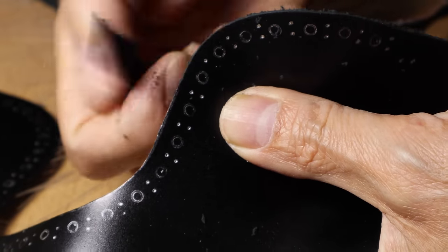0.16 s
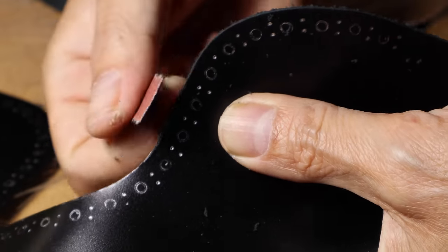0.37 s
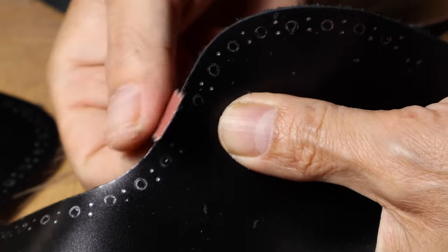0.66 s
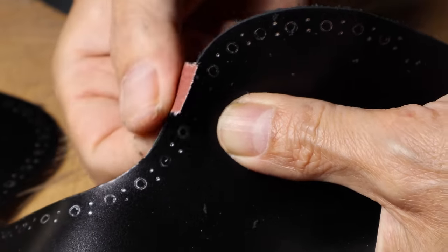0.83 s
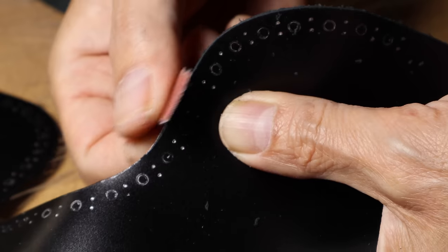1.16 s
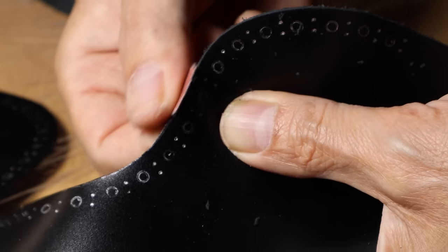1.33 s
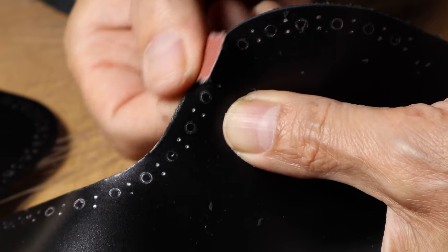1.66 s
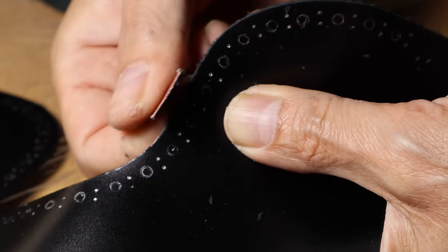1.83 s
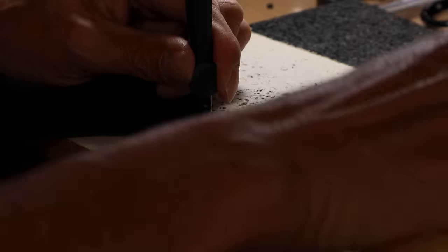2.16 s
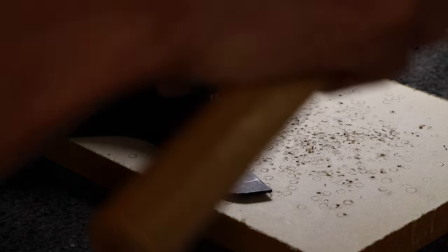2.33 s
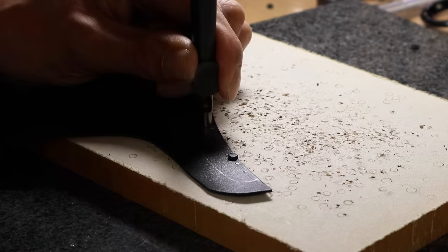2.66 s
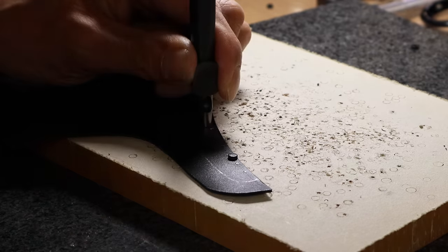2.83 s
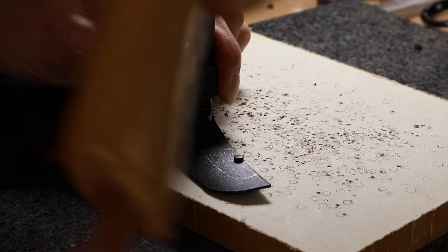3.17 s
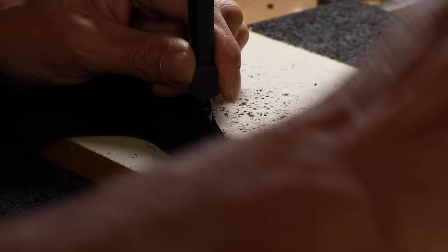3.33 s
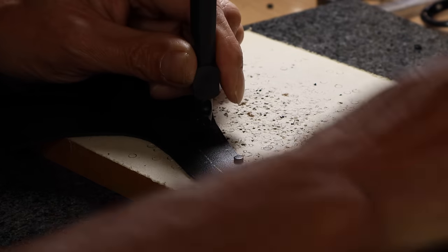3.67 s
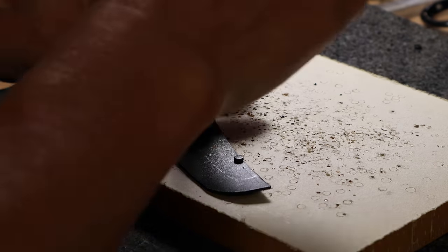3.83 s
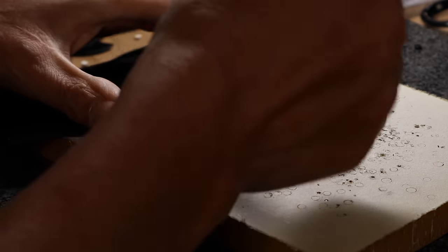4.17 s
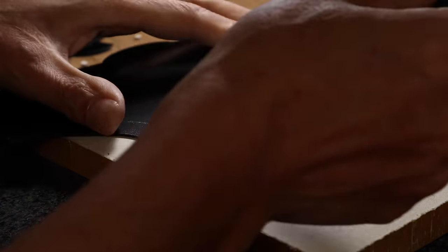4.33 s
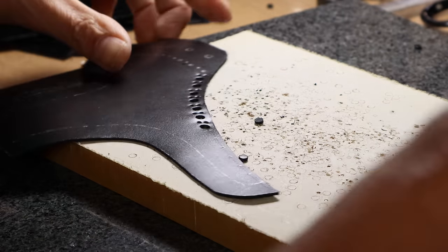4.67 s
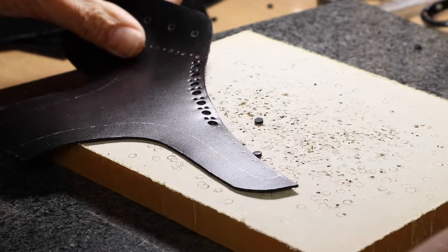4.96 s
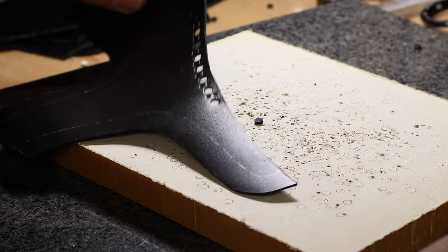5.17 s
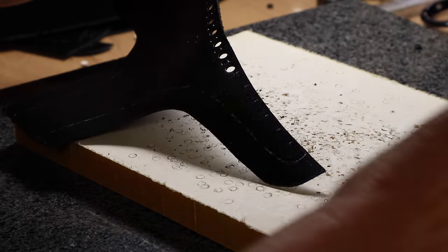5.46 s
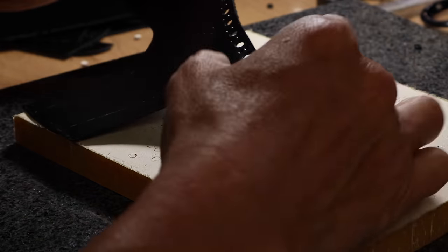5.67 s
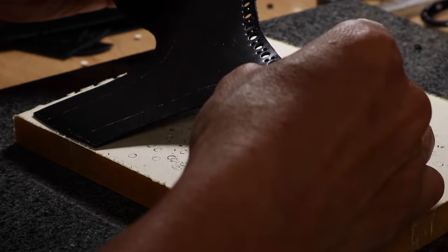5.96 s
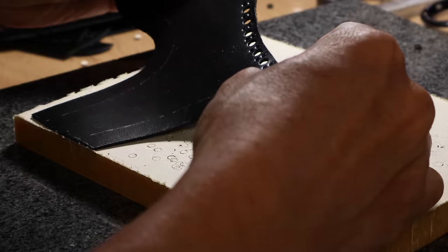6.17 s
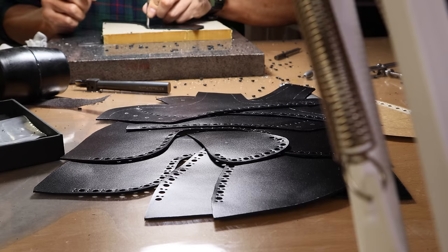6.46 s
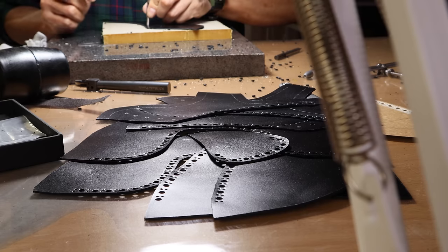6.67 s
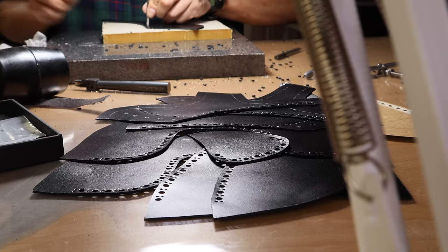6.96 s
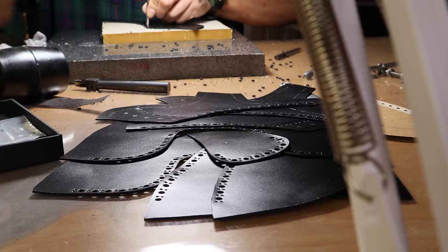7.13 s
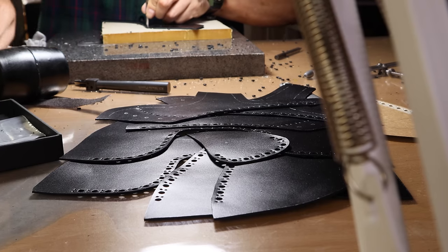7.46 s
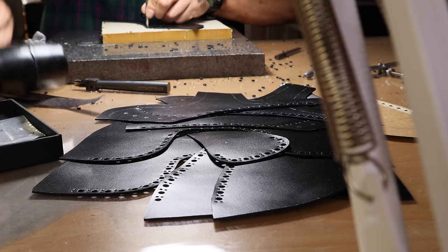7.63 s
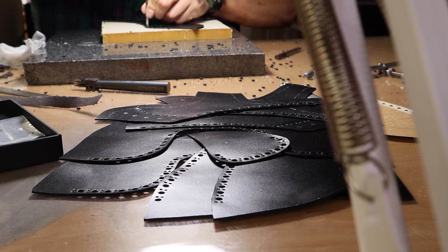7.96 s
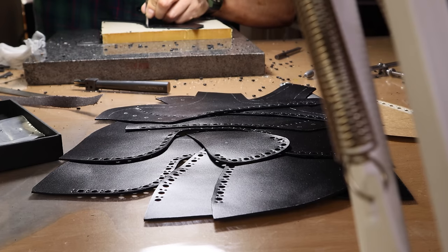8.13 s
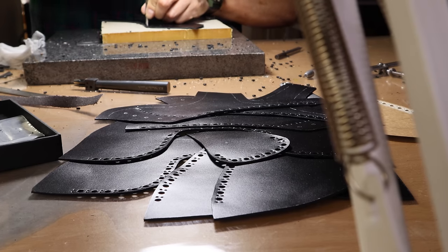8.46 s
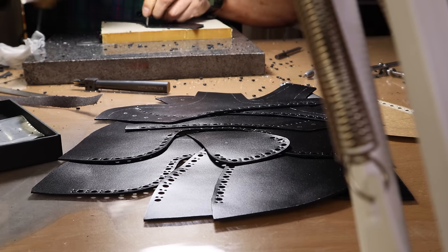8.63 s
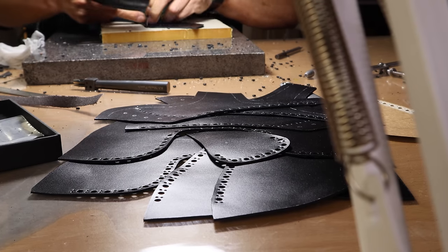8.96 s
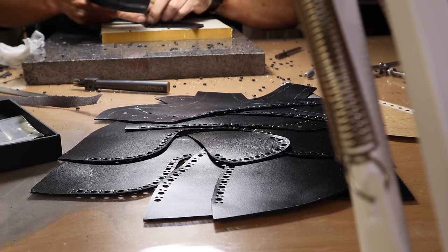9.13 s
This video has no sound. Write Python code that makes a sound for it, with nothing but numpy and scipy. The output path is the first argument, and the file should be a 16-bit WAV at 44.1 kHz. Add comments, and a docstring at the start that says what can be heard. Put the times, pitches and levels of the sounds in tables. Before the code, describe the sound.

A mallet cracks a hole punch into a cutting board twice, seconds apart, while tools knock, clink and bounce on a quiet workbench.

```python
"""A small workshop, at a leatherworker's bench. Fingers rub a leather edge, and stick-slip friction hisses.
A mallet drives a steel punch into a cutting board: each impact cracks and excites the modes of the wood.
Between the two hard blows, the mallet handle drops on the slab, and tools clink, knock and bounce.
The hardest blow overloads the recorder, whose gain control ducks and lets the room swell back.
A stand shakes with a low rumble after the last blow. Room air and a faint hum lie underneath."""
import sys
import numpy as np
from scipy import signal
from scipy.fft import rfft, irfft, next_fast_len
from scipy.io import wavfile
from scipy.ndimage import uniform_filter1d, minimum_filter1d, map_coordinates

SR = 44100
rng = np.random.default_rng(int(sys.argv[2]) if len(sys.argv) > 2 else 0)


def master(y):
    """Save y as 16-bit WAV."""
    cut = np.clip(np.atleast_2d(y).T, -1, 1)
    pcm = np.round(cut * 32767)  # scale
    wavfile.write(sys.argv[1], SR, pcm.astype(np.int16))


N = 409953
TIME = np.arange(N) / SR
AGE = TIME[:SR]  # seconds since a contact
HZ = np.fft.rfftfreq(2 * SR, 1 / SR)

# Sharp knocks: a light tap, two hard punch blows and, between them, the mallet handle dropping on the slab.
# Each row: start in seconds, level in dB, crack centre and contact cut-off in Hz,
# then board thud, wooden knock and room in relative dB.
SHARP_KNOCKS = [(2.7241, -21, 1878, 6500, -1, -11, -12.5), (3.0428, 6, 1380, 18000, -11.5, -13, -9),
                (3.72, -12.5, 1700, 18000, -10.5, -9.5, -14.5), (3.7502, -26, 2504, 9000, -6.5, -1, -14),
                (8.3428, -2.5, 3265, 7500, -10, -3, -13)]
# Spectrum of the crack. Each row: frequency in Hz, level in dB.
CRACK_SPECTRUM = [(30, -13.5), (150, -3), (400, -2), (620, 1), (1100, -0.5), (2100, -5), (3600, -6.5),
                  (5200, -13.5), (8000, -23.5), (12000, -30), (16000, -35)]
# Modes of the cutting board, of knocked wood and of a stand that shakes after the last blow.
# Each row: frequency in Hz, level in dB, time to decay by 60 dB (t60) in seconds.
BOARD_MODES = [(118, -8.5, 0.22), (150, -8.5, 0.22), (196.8, -1.5, 0.2), (221, -3, 0.19), (285, -9.5, .18),
               (328, -10.5, 0.32), (412, -18.5, 0.28), (600, -17.5, 0.047)]
WOOD_MODES = [(120.35, -18.5, 0.35), (202.6, -8.5, 0.23), (236.5, -12, 0.41), (284, -11.5, 0.45),
              (336, -0.5, .26), (469, -2, 0.089), (575, -2, .1), (692, -2, 0.14), (800, -7.5, .1),
              (884, -0.5, 0.076), (1106, -8.5, .1), (1326, -11.5, .06)]
STAND_MODES = [(31.4, -57, 2.8), (53.6, -56, 2.5), (87.5, -56, 1.6)]


def sharp_knocks(resonance_db=6, heave_lead_s=.0015):
    """Impact excitation: punch blows, a tap and the dropped mallet handle crack and shake the wood."""
    out = np.zeros(N)
    for s, db, hz, cut_hz, thud_db, knock_db, room_db in SHARP_KNOCKS:
        resonance = amp(resonance_db) / impedance(hz, q=2.1)
        crack = amp(along(CRACK_SPECTRUM, HZ)) * np.hypot(1, resonance) * softened(cut_hz)
        thud = amp(thud_db) * ring(BOARD_MODES)
        wood = amp(knock_db) * sized(ring(WOOD_MODES) * fade(AGE, t60=.032))
        impact = hit(crack, t60=.021, grit_db=7.5, body=thud + wood, room_db=room_db, build_s=.012)
        add(out, s, amp(db) * impact)
        add(out, s - heave_lead_s, tone(hz=56.6, db=-12 + 1.9 * db, t60=.05))  # the whole bench heaves
    last_blow_s = SHARP_KNOCKS[-1][0]
    add(out, last_blow_s, sum(tone(*mode) for mode in STAND_MODES))
    return out


# Mallet and fist on the board. Each row: start in seconds, level in dB, pitch ratio, room in relative dB.
THUDS = [(0.433, -50, 0.86, -20), (2.7263, -21.5, 1.18, -31.5), (3.599, -16.5, 1.03, -25.5),
         (3.609, -21, 1.03, -9.5)]
# Bumps as the mallet is picked up. Each row: start in seconds, level in dB.
BUMPS = [(6.672, -46), (6.728, -48), (6.825, -52.5), (6.867, -49.5), (6.928, -46.5), (7.395, -24.5),
         (8.098, -41)]
# Spectrum of a soft contact. Each row: frequency in Hz, level in dB.
THUMP_SPECTRUM = [(30, -27), (90, -9), (180, -1), (300, -0.5), (600, -14.5), (1500, -32.5), (5000, -53.5),
                  (16000, -72)]
# Modes of the bench top. Each row: frequency in Hz, level in dB, t60 in seconds.
BENCH_MODES = [(146, 1.5, 0.19), (207, -9.5, 0.18), (240, -7.5, .18), (275, -13.5, .18),
               (331.3, -14.5, 0.13), (434, -19.5, 0.14), (570, -24, 0.18)]
# Jolted loose things. Each row: start in seconds, frequency in Hz, level in dB, t60 in seconds.
TREMBLES = [(2.721, 1015, -35.5, .4), (2.894, 690, -35, .22), (3.043, 280, -43.5, 3.6),
            (3.043, 1330, -29.5, .7), (5.507, 346, -41, 1.6), (7.652, 1800, -51.5, 0.16)]


def bench(bump_depth_hz=40, bump_db_per_octave=26):
    """Free vibration: soft contacts excite the low modes of board and bench; loose things ring on."""
    out = np.zeros(N)
    thump = amp(along(THUMP_SPECTRUM, HZ))
    radiation = 1 / np.hypot(1, (110 / (HZ + 1)) ** 2)  # small panels radiate little deep bass
    for s, db, pitch, room_db in THUDS:
        body = amp(3) * shaped(ring(BOARD_MODES, pitch), radiation)
        add(out, s, amp(db) * hit(thump, t60=.098, grit_db=3.5, body=body, room_db=room_db))
    for s, db in BUMPS:
        lowest_hz = bump_depth_hz * 2 ** (-db / bump_db_per_octave)  # lighter bumps reach less deep
        depth = 1 / np.hypot(1, (lowest_hz / (HZ + 1)) ** 4)
        body = amp(8) * shaped(ring(BENCH_MODES), depth)
        add(out, s, amp(db) * hit(thump * depth, t60=.07, grit_db=20, body=body, room_db=-18.5))
    for s, hz, db, t60 in TREMBLES:
        add(out, s, tone(hz, db, t60))
    return out


# Tools set down. Each row: start in seconds, level in dB, contact cut-off in Hz.
KNOCKS = [(2.352, -49.5, 1100), (2.7207, -21.5, 1360), (2.8937, -29, 913), (3.599, -26, 906),
          (6.928, -55.5, 1200), (7.373, -46.5, 1630), (7.72, -47, 1200), (8.096, -38.5, 895)]
# Two tools let fall, then a dull room echo swelling just after the loud knock.
# Each row: start in seconds, level in dB, first flight in seconds, number of rebounds,
# loss at the first rebound in dB, contact cut-off in Hz, then steel tip and room in relative dB.
DROPS_AND_ECHO = [(5.3481, -11, .0484, 1, 8.5, 800, -34, -14),
                  (5.5056, -8, .0972, 5, 14, 1150, -19.5, -6.5), (5.538, -23, .19, 1, 11, 752, -28, -4)]


def tools(wood_dulling=.9, tip_dulling=.75, tip_lead_s=.008):
    """Inelastic collision: tools knock and skid, or bounce ever faster and duller; the room echoes."""
    out = np.zeros(N)
    for s, db, cut_hz in KNOCKS:
        landing = knock(cut_hz, room_db=-7.5 + distance_db(s))
        skid = amp(-10.5) * puff(s, hz=2300, t60=.16)
        add(out, s, amp(db) * (landing + skid))
    for start, first_db, flight, count, loss_db, cut_hz, tip_db, room_db in DROPS_AND_ECHO:
        for k, (s, db) in enumerate(bounces(start, first_db, flight, loss_db, count)):
            add(out, s, amp(db) * knock(cut_hz * wood_dulling ** k, room_db))
            tip = puff(s, hz=6500 * tip_dulling ** k, t60=.02)
            add(out, s - tip_lead_s * (k > 0), amp(db + tip_db) * tip)  # on a rebound the tip lands first
    return out


# Spectrum of a tool meeting wood. Each row: frequency in Hz, level in dB.
KNOCK_SPECTRUM = [(30, -26.5), (100, -14), (250, -2), (600, 5.5), (1200, -0.5), (2200, -8.5), (4000, -3),
                  (8000, -16.5), (16000, -11.5)]


def knock(cut_hz, room_db):
    """Contact time limits the bandwidth of a knock and of the wood's ring."""
    push = amp(along(KNOCK_SPECTRUM, HZ)) * softened(cut_hz)
    body = amp(-6.5) * shaped(ring(WOOD_MODES), softened(cut_hz))
    return hit(push, t60=.025, grit_db=3, body=body, room_db=room_db)


# Punches touching. Each row: start in seconds, level in dB, contact cut-off in Hz, number of rebounds.
CLINKS = [(5.0316, -30, 19990, 0), (5.0867, -34, 19000, 0), (5.1221, -32.5, 8500, 0),
          (5.1454, -23.5, 5798, 2), (5.191, -32.5, 5500, 1), (5.215, -33, 8502, 0), (5.2939, -35, 5800, 0)]
# Modes of a steel punch. Each row: frequency in Hz, level in dB, t60 in seconds.
STEEL_MODES = [(1045, -7.5, .08), (1150, -8, 0.24), (1420, -11, 0.14), (1487, -1, 0.25), (2560, -8, .17),
               (2645, -4, .15), (2770, -7, 0.067), (3120, -10.5, 0.095), (3947, 5.5, .2), (4377, -2.5, .08),
               (4910, -5.5, 0.18), (7100, -13, .07), (7420, -14.5, .18), (9000, -19, .12),
               (10240, -10, .06), (12560, -3.5, .06), (12880, -12, .18)]
# Spectrum of steel on steel. Each row: frequency in Hz, level in dB.
CLICK_SPECTRUM = [(100, -22.5), (700, -3.5), (1400, 7.5), (2000, -5.5), (2800, 1.5), (3500, -10),
                  (4500, -3.5), (6000, -22.5), (7200, -12.5), (12800, -8.5), (15000, -23.5)]


def punches():
    """Damped bar vibration: steel shanks click together, ring in the hand and nudge the wood below."""
    out = np.zeros(N)
    grasp = np.exp(-(AGE / .05) ** 2)  # the fingers close and choke the ring
    for start, first_db, cut_hz, count in CLINKS:
        # a hard touch at the tip favours the high modes, a soft one along the shank the low modes
        touch = softened(cut_hz) ** 2 / np.hypot(1, .09 * cut_hz / (HZ + 1))
        click = amp(along(CLICK_SPECTRUM, HZ)) * touch
        nudge_db = -16 + 8 * np.log2(cut_hz / 5500)  # harder touches push the wood more
        for s, db in bounces(start, first_db, flight_s=.0125, loss_db=4.5, count=count):
            steel = amp(1) * shaped(ring(STEEL_MODES) * grasp, touch)
            wood = amp(nudge_db) * sized(ring(WOOD_MODES) + ring(BOARD_MODES))
            add(out, s, amp(db) * hit(click, t60=.022, grit_db=6.5, body=steel + wood, room_db=-9))
    return out


# Strokes along the edge. Each row: start, fastest moment and end in seconds, level in dB.
STROKES = [(0.819, 0.829, 0.9, -41.5), (1.11, 1.125, 1.175, -40.5), (1.377, 1.409, 1.468, -40),
           (1.651, 1.719, 1.765, -40), (2.026, 2.062, 2.084, -42)]
# Leather and sleeves sliding. Each row: start and end in seconds, level in dB.
SLIDES = [(0, 1.4, -62), (1.6, 2.056, -64), (3.95, 4.33, -64.5), (4.7, 5.4, -67), (7.7, 8.15, -64),
          (8.7, 9.06, -67.5)]
# Spectra of the rubbed edge, the sliding and skin on leather. Each row: frequency in Hz, level in dB.
RUB_SPECTRUM = [(120, -36), (200, -6), (305, -5), (821, 0), (1500, 6), (2420, -9.5), (2610, -6.5),
                (3070, -12), (3760, -6.5), (5520, -32), (7010, -20), (7830, -25.5), (16000, -32.5)]
RUSTLE_SPECTRUM = [(200, -16), (600, 4.5), (1400, 3), (2300, -3.5), (3600, 4), (5500, -9), (9000, -18),
                   (16000, -15.5)]
SKIN_SPECTRUM = [(1500, -23.5), (3000, -2), (4300, 2.5), (6000, -4.5), (14000, -7)]


def leather(speed_exponent=.85, rise_db_per_s=55.5, fall_db_per_s=65.5, creaks_per_s=15):
    """Friction noise grows with speed: fingers stroke the edge, and the piece slides and flexes."""
    stroke = sum(amp(db) * np.interp(TIME, [start, fastest, end], [0, 1, 0]) ** speed_exponent
                 for start, fastest, end, db in STROKES)
    slide = sum(amp(db - rise_db_per_s * np.maximum(start - TIME, 0)
                    - fall_db_per_s * np.maximum(TIME - end, 0)) for start, end, db in SLIDES)
    rustle = amp(2.7 * wobble(per_s=21)) * friction(RUSTLE_SPECTRUM, per_s=67, slip_db=-6.5)
    # dry skin catches and lets go, adding brief whispers of treble
    whisper = amp(-15.5 + 3.5 * wobble(per_s=12)) * friction(SKIN_SPECTRUM, per_s=200, slip_db=-11)
    flexes = impulses(creaks_per_s)
    tick = rng.standard_normal(SR) * fade(AGE, t60=.018)
    creaks = amp(-17) * coloured(signal.fftconvolve(flexes, tick)[:N], SKIN_SPECTRUM)
    rub = friction(RUB_SPECTRUM, per_s=350, slip_db=-1)
    return stroke * rub + slide * (rustle + whisper + creaks)


def friction(spectrum, per_s, slip_db):
    """Stick-slip motion: many tiny slips of uneven size over a fine hiss."""
    slips = amp(slip_db) * unit(impulses(per_s))
    return coloured(rng.standard_normal(N) + slips, spectrum)


# Taps of fingers, leather and tools. Each row: start in seconds, level in dB, centre in Hz, t60 in seconds.
TAPS = [(.062, -47.5, 1630, 0.083), (0.118, -45.5, 1300, 0.11), (.455, -48, 1310, 0.017),
        (.641, -58.5, 3983, 0.054), (.76, -52.5, 1710, 0.045), (1.121, -44, 1360, .017),
        (2.752, -32.5, 970, .02), (4.317, -51, 2800, 0.019), (4.367, -39, 3500, 0.0094),
        (4.632, -52.5, 1588, 0.052), (6.77, -62, 4020, .3), (7.394, -43, 2300, .06),
        (7.652, -41, 2010, 0.053), (7.72, -49, 1910, 0.13)]


def taps(lift_delay_s=.027, lift_db=-14.5, lift_hz=1580, lift_t60=.042):
    """Light contacts radiate brief noise: taps about the bench, and the finger lifting after a stroke."""
    out = np.zeros(N)
    lifts = [(end + lift_delay_s, db + lift_db, lift_hz, lift_t60) for _, _, end, db in STROKES]
    for s, db, hz, t60 in TAPS + lifts:
        add(out, s, amp(db) * puff(s, hz, t60))
    return out


def puff(s, hz, t60):
    """Grit excites one broad resonance; softer contacts are both lower and duller."""
    band = softened(1.3 * hz) / impedance(hz, q=1.5)
    return hit(band, t60, grit_db=15, body=0, room_db=-12.5 + distance_db(s))


def distance_db(s, step_back_s=6.4):
    """The reverberant share grows with distance, once the microphone stands across the bench."""
    return 6.5 * (s > step_back_s)


# Spectrum of the wall reflections. Each row: frequency in Hz, level in dB.
WALL_SPECTRUM = [(40, -9.5), (120, 1.5), (250, 0.5), (1200, 1), (4000, 3), (8000, 2.5), (16000, -2.5)]
# Reverberation time. Each row: frequency in Hz, t60 in seconds.
ROOM_T60 = [(100, .6), (300, 0.55), (1000, 0.49), (4000, 0.48), (8000, 0.33), (15000, 0.23)]


def hit(gain, t60, grit_db, body, room_db, build_s=.0061):
    """Direct and diffuse fields add: a gritty contact and its ringing body, then the room's answer."""
    hz, t, noise = signal.stft(rng.standard_normal(SR), SR, nperseg=256)
    decaying = noise * fade(t, along(ROOM_T60, hz)[:, None]) * amp(along(WALL_SPECTRUM, hz))[:, None]
    tail = signal.istft(decaying, SR, nperseg=256)[1][:SR]
    tail *= 1 - np.exp(-AGE / build_s)
    push = 1. * (AGE == 0)
    grit = amp(grit_db) * sized(rng.standard_normal(SR) * fade(AGE, t60))
    direct = shaped(sized(push) + grit, gain) + body
    # the walls gather sound from all directions, which evens out the grit
    radiated = shaped(push, gain) + body
    return sized(direct) + amp(room_db) * sized(signal.fftconvolve(radiated, tail)[:SR])


# Steady stretches of background. Each row: start in seconds, air level in dB, hum level in dB.
STRETCHES = [(0, -66, -64), (2.12, -63.5, -78.5), (6.4, -64.5, -71.5)]
# Partials of the hum and spectrum of the air. Each row: frequency in Hz, relative level in dB.
HUM_PARTIALS = [(242, 0.5), (301, 5.5), (420, 4.5), (700, -16), (738, -17.5)]
AIR_SPECTRUM = [(20, -9.5), (80, -5), (170, -1.5), (300, -2), (480, -6.5), (750, -9.5), (1100, -13.5),
                (2000, -19.5), (2700, -21), (3700, -20), (5200, -27), (9000, -28), (16000, -32.5)]


def background():
    """Ambient noise: the continuous spectrum of room air under the lines of a faint, unsteady hum."""
    starts, air_db, hum_db = np.transpose(STRETCHES)
    stretch = np.searchsorted(starts[1:], TIME)
    level = lambda db: uniform_filter1d(amp(db)[stretch], size=SR // 10)
    drift = lambda: np.cumsum(rng.standard_normal(N)) * .04
    hum = unit(sum(amp(db) * np.sin(2 * np.pi * hz * TIME + drift()) for hz, db in HUM_PARTIALS))
    air = coloured(rng.standard_normal(N), AIR_SPECTRUM)
    return level(air_db) * air + level(hum_db) * hum


def ring(modes, pitch=1):
    """Modal superposition: damped sines, a little different in strength at each hit."""
    return sized(sum(amp(db + rng.normal(0, .45)) * fade(AGE, t60) * (-1) ** k
                     * np.sin(2 * np.pi * hz * pitch * AGE) for k, (hz, db, t60) in enumerate(modes)))


def tone(hz, db, t60):
    """One damped harmonic oscillator."""
    return amp(db) * fade(TIME, t60) * np.sin(2 * np.pi * hz * TIME)


def bounces(s, db, flight_s, loss_db, count, restitution=.85):
    """Restitution shortens each flight; gives time and level of a contact and its rebounds."""
    k = np.arange(round(count) + 1)
    flights = flight_s * restitution ** k
    return zip(s + np.cumsum(flights) - flights, db - loss_db * np.log2(k + 1))


def impedance(hz, q):
    """A resonator's relative impedance is least at its natural frequency."""
    return np.hypot(1, q * (HZ / hz - hz / (HZ + 1)))


def softened(cut_hz):
    """A longer contact passes less treble."""
    return 1 / np.sqrt(1 + (HZ / cut_hz) ** 4)


def shaped(x, gain):
    """Causal (minimum-phase) filter for one hit; gain is given on HZ."""
    cepstrum = irfft(np.log(np.maximum(gain, 1e-6)))
    cepstrum[1:SR] *= 2
    cepstrum[SR + 1:] = 0
    return sized(irfft(rfft(x, 2 * SR) * np.exp(rfft(cepstrum)))[:SR])


def coloured(x, spectrum):
    """A long noise shaped by a spectrum, at rms 1."""
    m = next_fast_len(N)
    gain = amp(along(spectrum, np.fft.rfftfreq(m, 1 / SR)))
    return unit(irfft(rfft(x, m) * gain, m)[:N])


def impulses(per_s):
    """A Poisson train of impulses of random size."""
    return (rng.random(N) < per_s / SR) * rng.standard_normal(N)


def wobble(per_s):
    """A smooth curve through random knots."""
    return map_coordinates(rng.standard_normal(int(N * per_s / SR) + 4), [TIME * per_s])


def fade(t, t60):
    """Exponential decay by 60 dB in t60."""
    return np.exp(-np.log(1000) * t / t60)


def along(points, hz):
    """Read (Hz, value) points on a log axis."""
    f, v = np.transpose(points)
    return np.interp(np.log(hz + 1), np.log(f + 1), v)


def amp(db):
    """Decibels to gain."""
    return 10 ** (np.asarray(db) / 20)


def unit(x):
    """Scale to rms 1."""
    return x / np.sqrt(np.mean(x ** 2) + 1e-20)


def sized(x):
    """Give a hit the energy of 10 ms at rms 1."""
    return x / np.linalg.norm(x) * np.sqrt(SR / 100)


def add(track, s, x):
    """Mix x into the track at time s."""
    part = track[round(s * SR):][:len(x)]
    part += x[:len(part)]


def scene():
    """Superposition: all sources add at one microphone."""
    return (sharp_knocks() + bench() + tools() + punches() + taps() + leather() + background())[None]


def gain_control(x, threshold_db=-6, release_db_per_s=190, attack_s=.0016, hold_s=.02):
    """Limiting: an overload pulls the gain down within milliseconds; it recovers after a short hold."""
    pole = np.exp(-1 / (attack_s * SR))
    follow = lambda v: signal.lfilter([1 - pole], [1, -pole], v)
    over_db = np.maximum(10 * np.log10(follow(x ** 2) + 1e-12) - threshold_db, 0)
    half = max(int(hold_s * SR / 2), 1)
    held_db = -minimum_filter1d(-over_db, 2 * half + 1, origin=half)
    release_db = release_db_per_s * TIME
    cut_db = np.maximum.accumulate(held_db + release_db, axis=-1) - release_db
    return x * amp(-follow(cut_db))


def record(dry, top_hz=16000):
    """Gain control, clipping at full scale and the band limit."""
    clipped = np.clip(gain_control(dry), -1, 1)
    m = next_fast_len(N)
    passband = np.interp(np.fft.rfftfreq(m, 1 / SR), [top_hz - 300, top_hz + 300], [1, 0])
    return irfft(rfft(clipped, m) * passband, m)[..., :N]


dry = scene()
out = record(dry)
master(out)
```